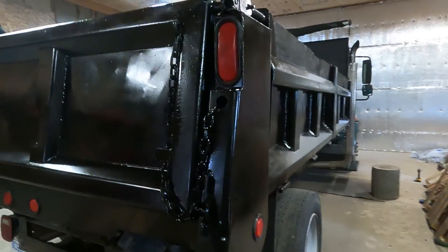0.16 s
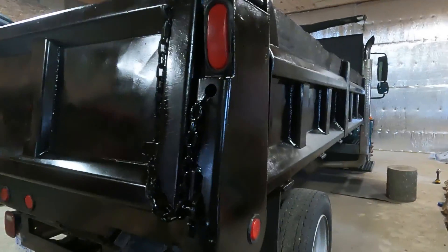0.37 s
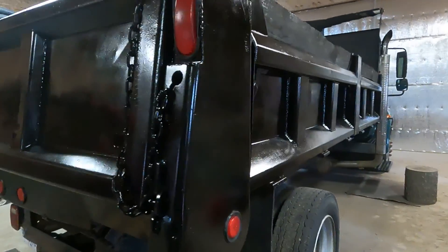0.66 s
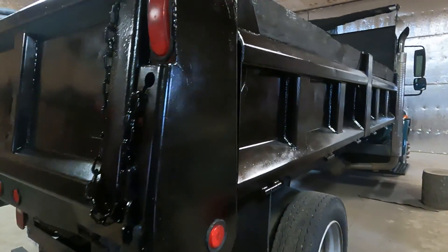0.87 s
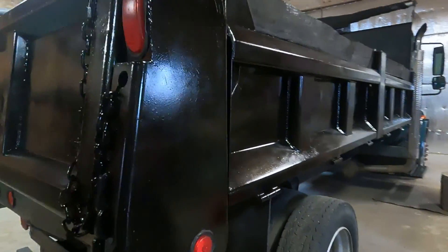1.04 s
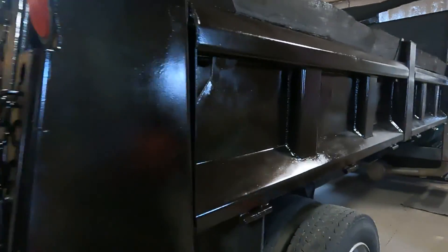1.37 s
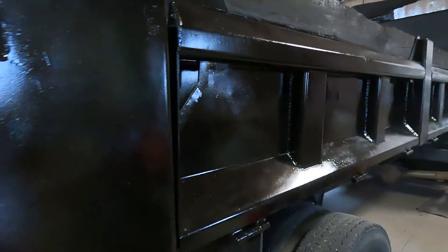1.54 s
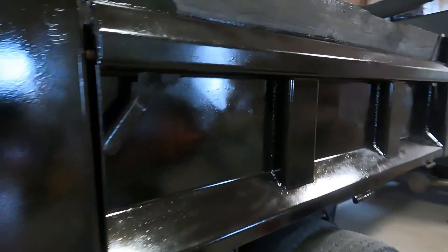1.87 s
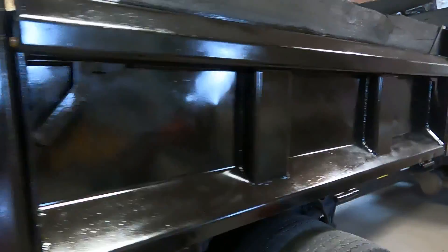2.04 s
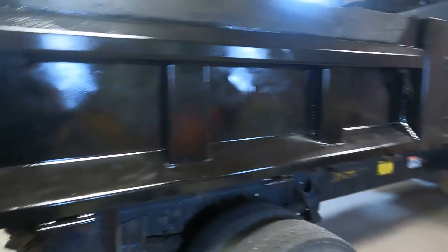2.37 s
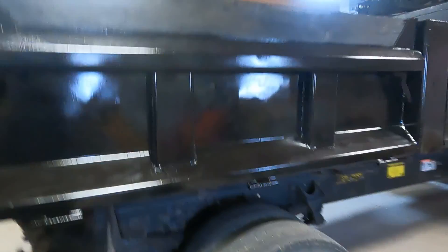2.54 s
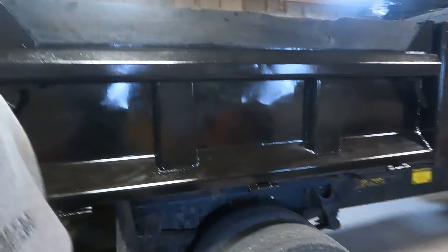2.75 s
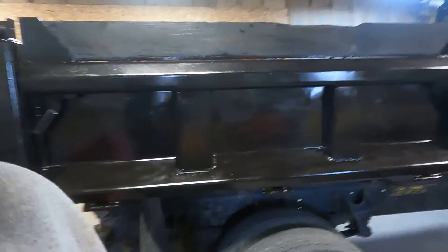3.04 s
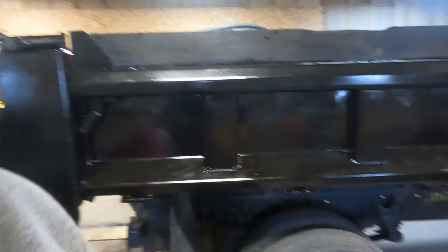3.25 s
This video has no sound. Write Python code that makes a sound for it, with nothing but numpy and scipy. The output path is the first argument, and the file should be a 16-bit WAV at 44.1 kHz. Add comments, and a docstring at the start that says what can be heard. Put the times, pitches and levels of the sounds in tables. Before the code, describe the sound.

Shoes scuff over gritty concrete in an echoing workshop. Light scrapes start around 0.2 seconds, with a sharper crunching step at 0.7. Softer shuffles follow from 1.3 to 1.9. A firm heel thud lands at 2.3, then busier scraping and cracking grit run until about 3.1, while clothing rustles louder near the microphone. A quiet room rumble lies underneath throughout.

```python
"""Shoes scuff and shuffle over gritty concrete in an echoing workshop.
Each scuff is a stream of tiny slips that sounds in the sole, rasps on the concrete and crunches grit;
short resonances ring underfoot. Heels thud and single grains crack. The walker holds a
camera, and clothing rustles near its microphone over a quiet room rumble."""
import sys
import numpy as np
from scipy import signal
from scipy.fft import rfft, irfft, next_fast_len
from scipy.io import wavfile
from scipy.ndimage import map_coordinates

SR = 44100
rng = np.random.default_rng(int(sys.argv[2]) if len(sys.argv) > 2 else 0)


def waveform_to_disk(signal):
    """Save audio, clipped to [-1, 1], as 16-bit WAV at the path in sys.argv[1]."""
    frames = np.transpose(np.atleast_2d(signal))
    scaled = np.clip(frames, -1, 1) * 32767
    samples = np.round(scaled).astype(np.int16)
    wavfile.write(sys.argv[1], SR, samples)


N = 149940  # 3.4 s


def amp(db):
    """Decibels to gain."""
    return 10 ** (np.asarray(db) / 20)


def unit(x):
    """Scale to rms 1."""
    return x / np.sqrt(np.mean(x ** 2) + 1e-20)


def along(points, hz):
    """Interpolate (f/Hz, value) points on a log frequency axis."""
    f, v = np.transpose(points)
    return np.interp(np.log(hz + 1), np.log(f + 1), v)


def filtered(x, response):
    """Zero-phase filter with gain response(f/Hz)."""
    size = next_fast_len(N + SR // 2)
    return irfft(rfft(x, size) * response(np.fft.rfftfreq(size, 1 / SR)), size)[..., :N]


def impulse(colour, size=4096):
    """Minimum-phase impulse response of a (f/Hz, gain/dB) curve."""
    cepstrum = irfft(np.log(amp(along(colour, np.fft.rfftfreq(size, 1 / SR)))))
    cepstrum[1:size // 2] *= 2
    cepstrum[size // 2 + 1:] = 0
    return irfft(np.exp(rfft(cepstrum)))


def coloured(x, colour):
    """Causal filter along a (f/Hz, gain/dB) curve."""
    return signal.fftconvolve(x, impulse(colour))[:N]


def wobble(per_s):
    """Smooth random curve, rms 1."""
    knots = np.arange(N) * per_s / SR
    return unit(map_coordinates(rng.standard_normal(int(knots[-1]) + 2), [knots]))


def uneven(spread_db):
    """Log-normal gain per sample, clipped at 2 sigma."""
    return amp(spread_db * np.clip(rng.standard_normal(N), -2, 2))


def friction(colour, slips_per_s=2500, hiss_share=0.31):
    """Stick-slip: tiny slips of uneven size over an even hiss, rms 1."""
    slips = (rng.random(N) < slips_per_s / SR) * rng.choice([-1, 1], N) * uneven(spread_db=6.5)
    drive = np.sqrt(1 - hiss_share) * unit(slips) + np.sqrt(hiss_share) * rng.standard_normal(N)
    return unit(coloured(drive, colour))


# Room noise spectrum: f/Hz, gain/dB
ROOM_COLOUR = [(25, -11), (55, -9), (80, -6.5), (105, 0.5), (140, -2.5), (205, 5.5), (400, -24),
               (900, -12.5), (2800, -10.5), (5000, -17), (8500, -40), (12000, -42), (14000, -55)]

def room_noise(level_db=-45.5, waver_db=1.5, corner_hz=400):
    """The workshop's wavering rumble and faint steady hiss."""
    noise = amp(level_db) * unit(coloured(rng.standard_normal(N), ROOM_COLOUR))
    rumble = filtered(noise, lambda hz: 1 / (1 + (hz / corner_hz) ** 2) ** 2)
    return noise + rumble * (amp(waver_db * wobble(per_s=9.1)) - 1)


# Echo decay: f/Hz, T60/s
ECHO_T60 = [(100, 0.27), (300, 0.61), (800, 0.74), (2000, 0.69), (4500, 0.55), (8000, 0.76), (13000, 0.34)]
# Echo send: f/Hz, gain/dB
ECHO_COLOUR = [(100, -5.5), (400, -5), (1500, -6.5), (4000, -6), (12000, -7.5)]

def workshop_echo(x, places=6, build_s=0.014):
    """Diffuse echo whose fine pattern changes as the walker moves on."""
    out, position = np.zeros(N), np.linspace(0, places - 1, N)
    for place in range(places):
        hz, t, noise = signal.stft(rng.standard_normal(SR), SR, nperseg=256)
        t60 = along(ECHO_T60, hz)[:, None]
        tail = signal.istft(noise * amp(-60 * t / t60) / np.sqrt(t60), SR, nperseg=256)[1]
        tail *= 1 - np.exp(-np.arange(len(tail)) / SR / build_s)
        crossfade = np.sqrt(np.maximum(1 - abs(position - place), 0))
        out += signal.fftconvolve(x * crossfade, tail / np.linalg.norm(tail))[:N]
    return coloured(out, ECHO_COLOUR)


# Rustle envelope: t/s, level/dB
RUSTLE_LEVELS = [(0, -42.5), (.6, -45), (1.15, -49), (1.499, -44), (2.05, -43.5), (2.22, -38), (2.4, -30.5),
                 (2.7, -33.5), (2.9, -32), (3.08, -37), (3.2, -51), (3.4, -49)]
# Fabric spectrum: f/Hz, gain/dB
FABRIC_COLOUR = [(40, -26), (130, -27.5), (200, -16), (305, 1), (450, -4.5), (800, -11.5), (1700, -7),
                 (3500, -11), (6000, -18), (8500, -35.5), (12000, -35.5), (14000, -87)]

def clothing():
    """Fabric rubs as the walker moves and turns."""
    times_s, levels_db = np.transpose(RUSTLE_LEVELS)
    return amp(np.interp(np.arange(N) / SR, times_s, levels_db)) * friction(FABRIC_COLOUR)


# Heel and sole landings: t/s, level/dB
LANDINGS = [(0.208, -37), (0.246, -37), (0.707, -27), (0.723, -24), (1.271, -36), (1.597, -30.5),
            (2.152, -30), (2.27, -25), (2.305, -27.5), (2.32, -12), (2.333, -32)]
# Heel resonances: f/Hz, level/dB, T60/s
HEEL_RESONANCES = [(175.7, -12, .08), (221, -1, 0.038), (324, -5.5, 0.055), (433, -5.5, 0.11)]
# Impact spectrum: f/Hz, gain/dB
HEEL_COLOUR = [(30, -25), (90, -26), (160, 1), (260, 4), (430, -2.5), (650, -12), (1500, -31), (5000, -71)]

def heel_thuds(attack_s=0.00033, burst_t60_s=0.043, burst_db=1, ring_db=2, low_cut_hz=207):
    """Each landing is a soft low burst and a short hollow ring of the heel."""
    t, envelope, ring = np.arange(SR // 3) / SR, np.zeros(N + SR), np.zeros(N + SR)
    for start, db in LANDINGS:
        blow = amp(db) * (1 - np.exp(-t / attack_s))
        modes = sum(amp(mode_db + rng.normal(0, 0.67) - 60 * t / t60) * np.sin(2 * np.pi * hz * t)
                    for hz, mode_db, t60 in HEEL_RESONANCES)
        envelope[round(start * SR):][:len(t)] += blow * amp(-60 * t / burst_t60_s)
        ring[round(start * SR):][:len(t)] += blow * modes
    burst = coloured(envelope[:N] * rng.standard_normal(N), HEEL_COLOUR)
    burst /= np.linalg.norm(impulse(HEEL_COLOUR))
    low_cut = signal.butter(2, low_cut_hz, "highpass", fs=SR, output="sos")
    return signal.sosfilt(low_cut, amp(burst_db) * burst + amp(ring_db) * ring[:N])


# Grains breaking: t/s, peak/dB
GRAIN_BREAKS = [(0.4828, -12), (0.7382, -5.5), (0.8796, -8), (1.371, -20), (1.6145, -15), (1.812, -24),
                (1.854, -15), (2.099, -26), (2.4711, -5.5), (2.5112, -9), (2.6276, -10), (2.7185, -13),
                (2.869, -11), (2.9495, -25)]
# Crack spectrum: f/Hz, gain/dB
CRACK_COLOUR = [(200, -19), (700, 15), (1400, 8), (3800, 19.5), (6000, 0), (8500, -22), (12000, -41),
                (14000, -79)]

def grain_cracks(crumble_gain=0.067, crumble_t60_s=0.002):
    """A grain under the shoe snaps at once, then crumbles briefly."""
    out, t = np.zeros(N + SR), np.arange(SR // 20) / SR
    for start, db in GRAIN_BREAKS:
        crack = crumble_gain * rng.standard_normal(len(t)) * amp(-60 * t / crumble_t60_s)
        crack[0] = 1  # the snap
        out[round(start * SR):][:len(t)] += amp(db) * crack
    return coloured(out, CRACK_COLOUR) / np.abs(impulse(CRACK_COLOUR)).max()


# Short resonances underfoot: t/s, length/s, f/Hz, Q, level/dB
UNDERFOOT_RESONANCES = [(0.416, .045, 1470, 8, -34), (0.708, .045, 736, 4.6, -23.5),
                        (.716, 0.026, 1345, 6, -19), (.720, 0.041, 2120, 8.7, -23),
                        (.872, 0.012, 3470, 7.1, -30), (1.269, 0.039, 3530, 6.7, -28),
                        (1.275, .13, 237, 3.5, -42.5), (1.355, 0.09, 2180, 3.5, -35),
                        (1.56, 0.061, 432, 7.6, -38), (1.811, 0.053, 3600, 5.1, -35),
                        (2.097, 0.011, 910, 1.6, -39.5), (2.144, 0.023, 470, 7.4, -33.5),
                        (2.142, 0.033, 1255, 6.7, -32.5), (2.318, .028, 422, 9.8, -24.5),
                        (2.37, 0.12, 1590, 31, -31.5), (2.503, 0.033, 1235, 19, -24.5),
                        (2.549, 0.082, 1190, 8.7, -24), (2.775, 0.037, 1440, 3.9, -25.5),
                        (2.865, 0.018, 3830, 11, -23), (2.924, 0.028, 1030, 4.4, -26.5),
                        (3.027, 0.06, 1200, 21, -33.5), (3.038, .03, 2600, 2.3, -26.5)]

def underfoot_resonances(arch_power=0.4):
    """Sole chatter, ringing grit crunch, one low thud: each a noise-driven resonance, swelling, fading."""
    out, t = np.zeros(N + SR), np.arange(SR // 4) / SR
    for start, length, hz, q, db in UNDERFOOT_RESONANCES:
        arch = np.abs(np.sin(np.pi * np.minimum(t / length, 1))) ** arch_power
        drive = signal.lfilter(*signal.iirpeak(hz, 1, SR), rng.standard_normal(len(t)))
        tone = signal.lfilter(*signal.iirpeak(hz, q, SR), drive)
        out[round(start * SR):][:len(t)] += amp(db) * unit(tone * arch) * np.sqrt(np.mean(arch ** 2))
    return out[:N]


# Shoe slides: t/s, rise/s, fall/s, sole/dB, rasp/dB, grit/dB
SLIDES = [ (.206, 0.032, 0.09, -27.5, -35.5, -30.5), (.280, 0.019, 0.043, -42, -38, -35.5),
          (0.409, 0.023, 0.092, -39, -30.5, -27), (0.477, 0.008, 0.095, -40.5, -31.5, -32),
          (.502, 0.0066, 0.011, -32, -39, -44), (.701, 0.028, 0.033, -25.5, -22.5, -22),
          (0.848, .030, 0.022, -55, -32, -27), (1.27, 0.028, 0.059, -42, -38.5, -29.5),
          (1.335, 0.042, 0.13, -48, -39, -34), (1.550, 0.063, .06, -35, -37.5, -37),
          (1.626, 0.015, 0.035, -59, -50, -33.5), (1.682, 0.0073, 0.16, -54, -45, -34.5),
          (1.809, .003, 0.015, -58, -50, -28), (1.828, 0.028, 0.034, -44, -37, -29),
          (2.142, 0.025, 0.0098, -54, -47, -32), (2.26, .016, 0.15, -35, -35, -26.5),
          (2.300, 0.062, 0.046, -38, -28, -26), (2.375, 0.037, 0.052, -32.5, -39, -56),
          (2.503, 0.0066, 0.091, -59, -23.5, -26.5), (2.542, 0.052, 0.052, -31.5, -26, -20.5),
          (2.619, 0.0088, 0.015, -33, -20.5, -23), (2.770, 0.034, 0.053, -40, -28, -27),
          (2.868, .003, 0.029, -36, -42, -24), (2.895, 0.0074, 0.058, -38, -47, -29),
          (2.920, 0.029, 0.033, -26, -39, -25), (3.016, 0.037, 0.037, -32, -27, -22.5), ]
# Spectra of hollow sole, concrete rasp, grit crunch and fine sand: f/Hz, gain/dB
SOLE_COLOUR = [(40, -39), (80, -22), (200, -12), (350, -3), (550, -1), (800, -1.5), (1150, -13),
               (2000, -26.5), (6000, -39)]
RASP_COLOUR = [(300, -46.5), (800, -9.5), (1250, 4), (1650, 5), (2100, 6), (2900, -7), (5000, -37.5),
               (12000, -53.5)]
GRIT_COLOUR = [(600, -40.5), (1500, -11), (2300, -2.5), (3500, -0.5), (5000, -5), (6800, -13), (8300, -26),
               (10300, -27.5), (12000, -26.5), (14000, -85)]
SAND_COLOUR = [(2000, -37), (5000, -38), (7000, 21.5), (8500, -12), (12000, 10), (14000, -17)]

def shoe_scuffs(rise_power=0.49, fall_power=1.43, fall_db=15, sand_per_s=300, sand_re_grit_db=-24.5):
    """Each slide swells and lets go with its own mix of sole, rasp and grit; fine sand ticks along."""
    t, power = np.arange(N) / SR, np.zeros((3, N))
    for start, rise, fall, *levels_db in SLIDES:
        swell = np.clip((t - start) / rise, 0, 1) ** rise_power
        release = amp(-fall_db * np.clip((t - start - rise) / fall, 0, 10) ** fall_power)
        power += (amp(levels_db)[:, None] * swell * release) ** 2
    sole_gain, rasp_gain, grit_gain = np.sqrt(power)
    ticks = (rng.random(N) < sand_per_s / SR) * uneven(spread_db=3)
    sand = amp(sand_re_grit_db) * unit(coloured(ticks, SAND_COLOUR))
    sole = sole_gain * friction(SOLE_COLOUR)
    rasp = rasp_gain * friction(RASP_COLOUR)
    grit = grit_gain * (friction(GRIT_COLOUR) + sand)
    return sole + rasp + grit


# Stereo width: f/Hz, side re mid/dB
SIDE_COLOUR = [(30, -20), (100, -32), (300, -45), (1100, -64), (3000, -64.5), (4800, -48.5), (7000, -23),
               (9500, -20.5), (12000, -4.5)]

def scene(heel_send_db=-2.5):
    """Feet and clothing in the workshop; near mono, with the high treble flickering between the ears."""
    scrapes = shoe_scuffs() + underfoot_resonances() + grain_cracks() + clothing()
    heels = heel_thuds()
    echo = workshop_echo(scrapes + amp(heel_send_db) * heels)
    mid = scrapes + heels + echo + room_noise()
    side = filtered(mid * wobble(per_s=200), lambda hz: amp(along(SIDE_COLOUR, hz)))
    return np.array([mid + side, mid - side])


def record(dry):
    """The camera's microphone has a narrow treble notch and a steep band limit."""
    notch_hz, width_hz, top_hz = 9070, 310, 14000
    notch = lambda hz: 1 - np.exp(-((hz - notch_hz) / width_hz) ** 2)
    return filtered(dry, lambda hz: notch(hz) * (hz < top_hz))


dry = scene()
out = record(dry)
waveform_to_disk(out)
```